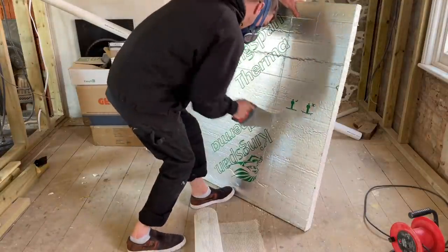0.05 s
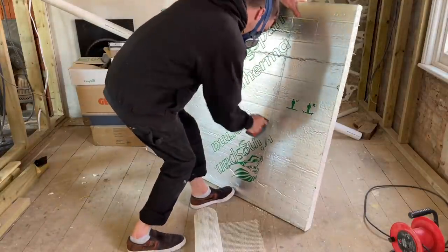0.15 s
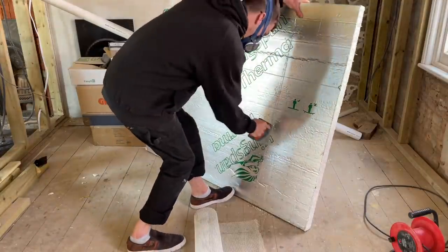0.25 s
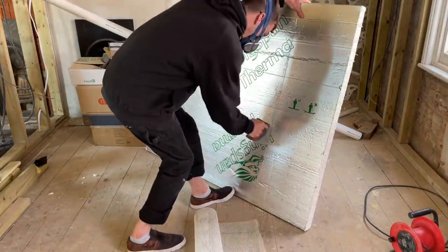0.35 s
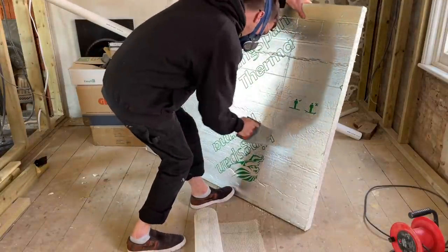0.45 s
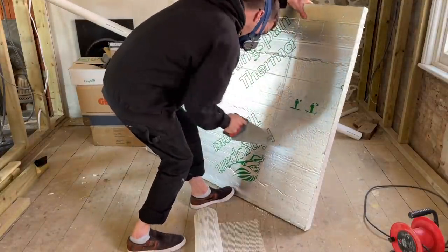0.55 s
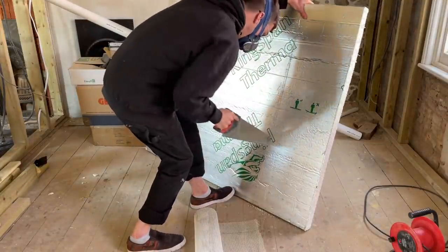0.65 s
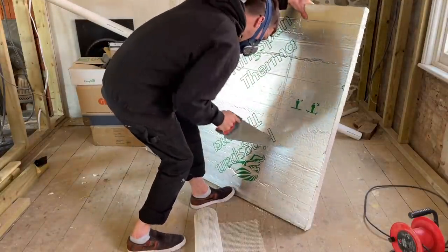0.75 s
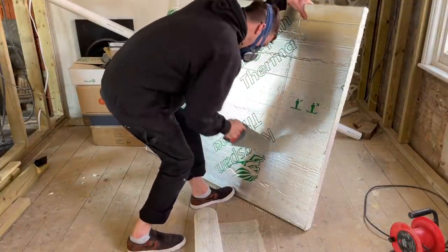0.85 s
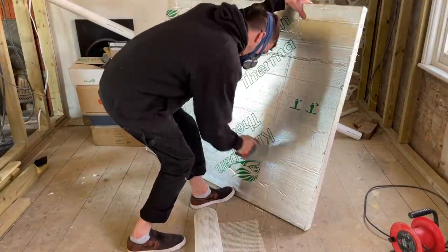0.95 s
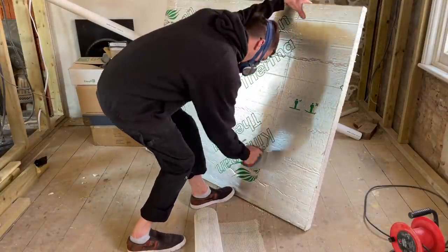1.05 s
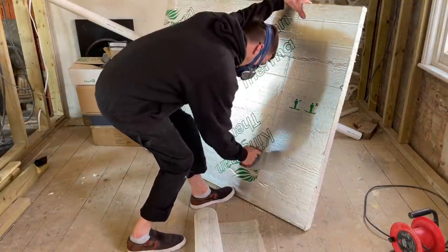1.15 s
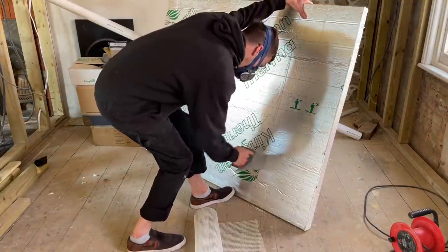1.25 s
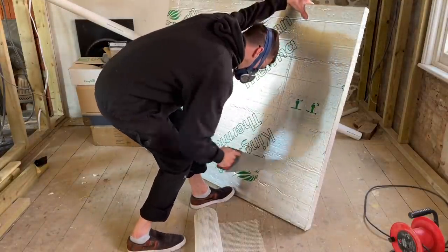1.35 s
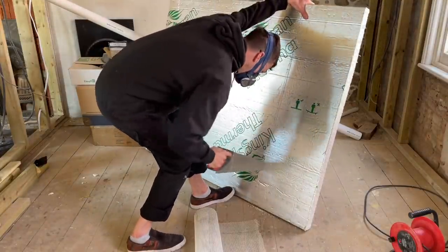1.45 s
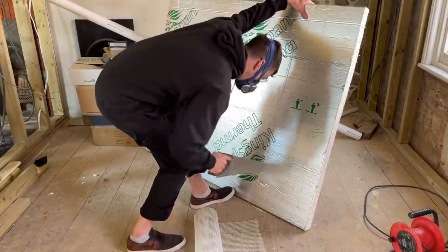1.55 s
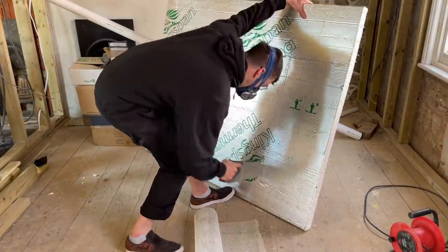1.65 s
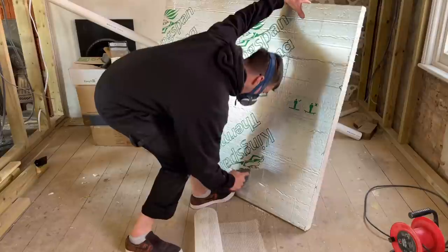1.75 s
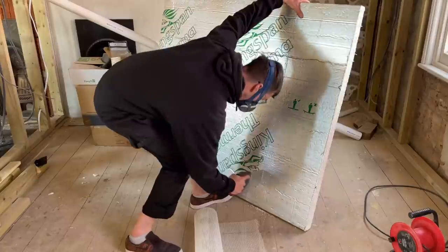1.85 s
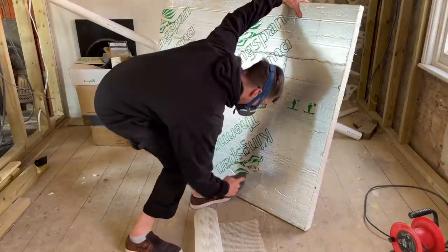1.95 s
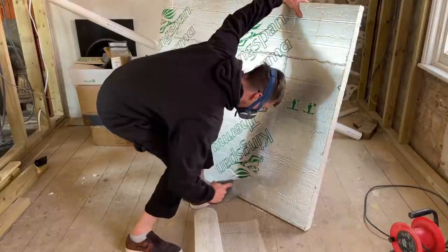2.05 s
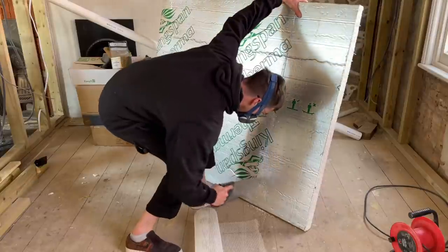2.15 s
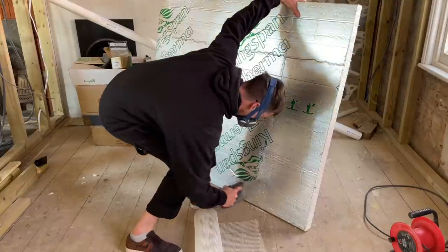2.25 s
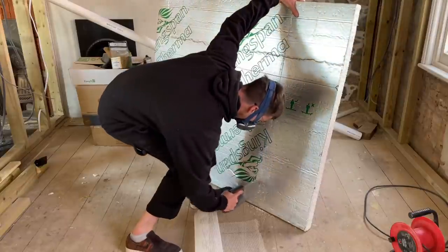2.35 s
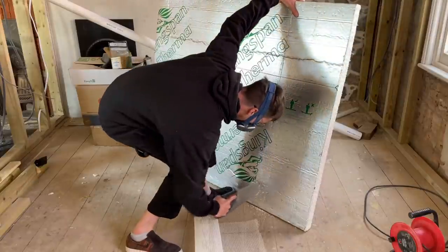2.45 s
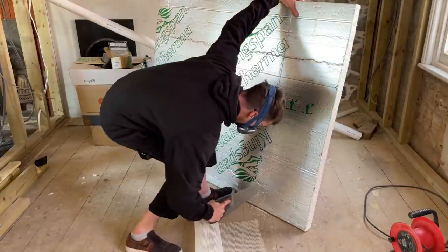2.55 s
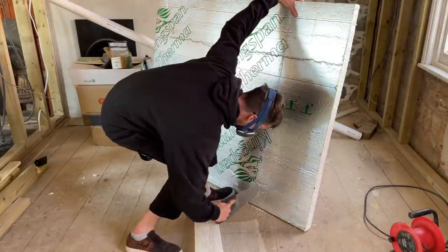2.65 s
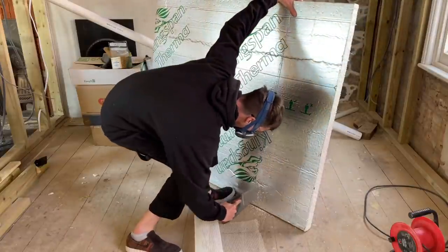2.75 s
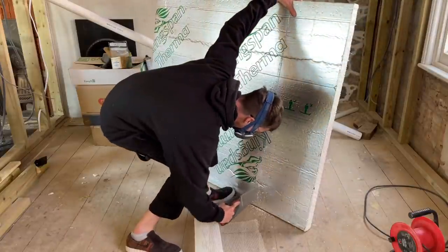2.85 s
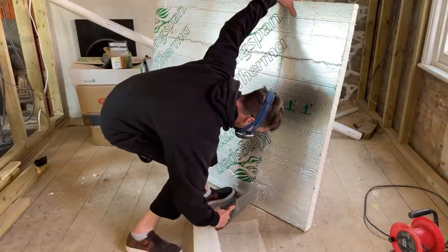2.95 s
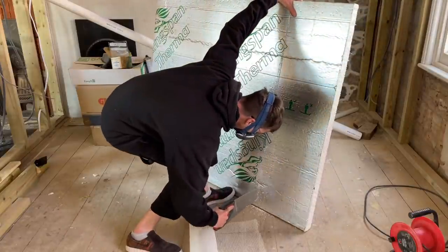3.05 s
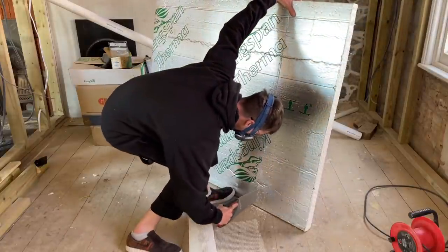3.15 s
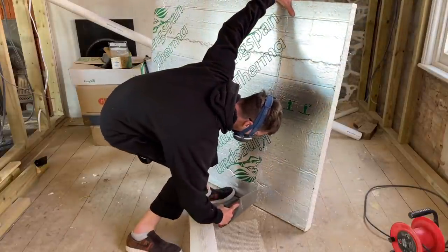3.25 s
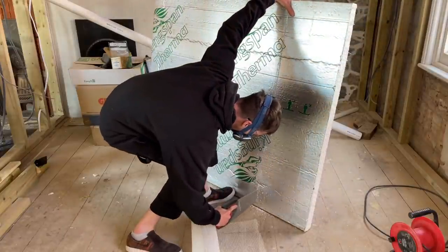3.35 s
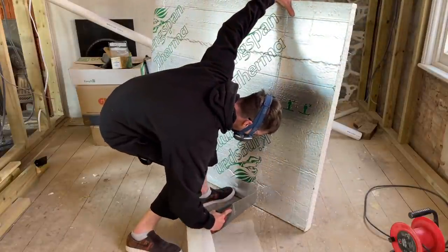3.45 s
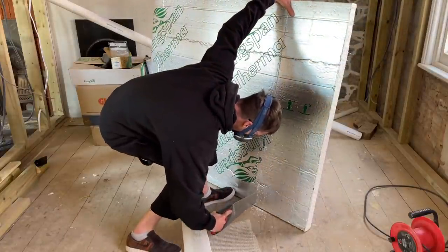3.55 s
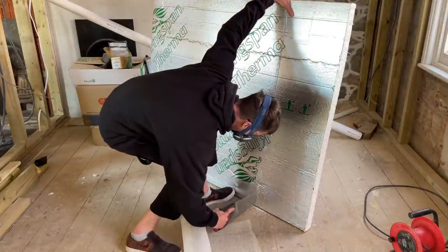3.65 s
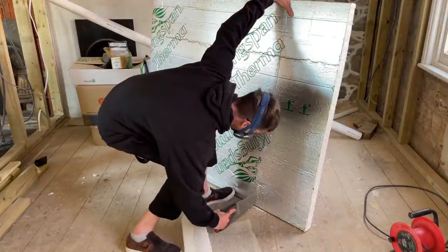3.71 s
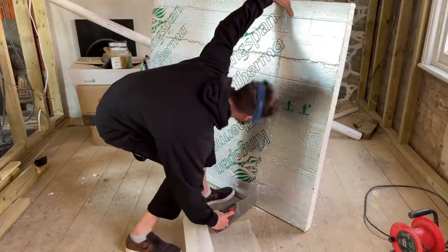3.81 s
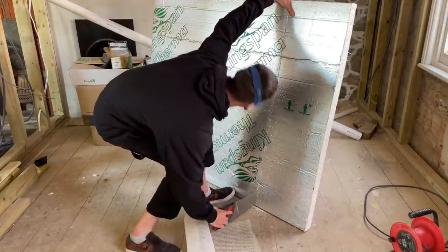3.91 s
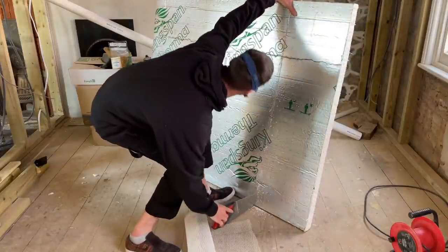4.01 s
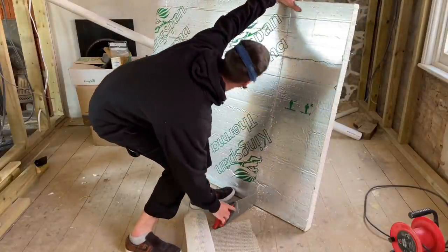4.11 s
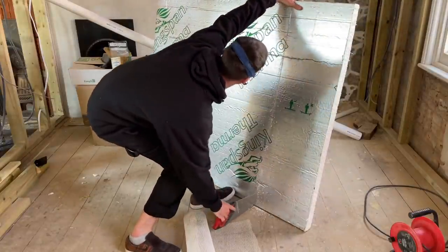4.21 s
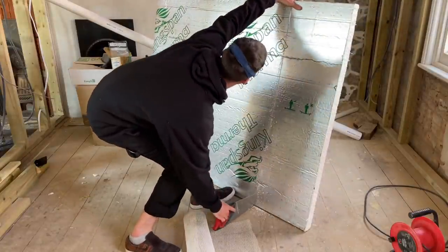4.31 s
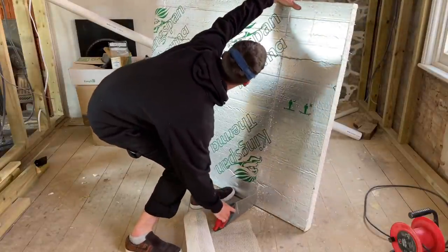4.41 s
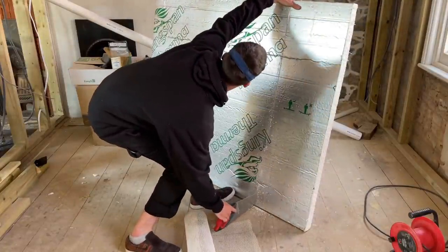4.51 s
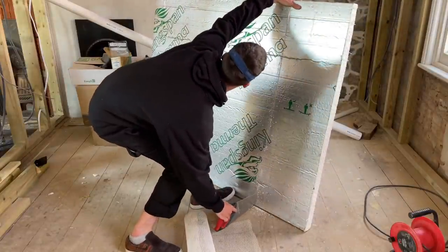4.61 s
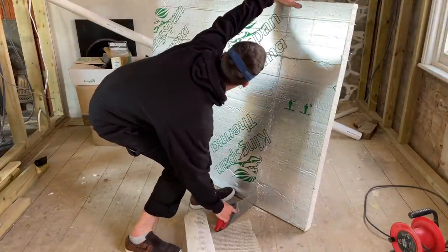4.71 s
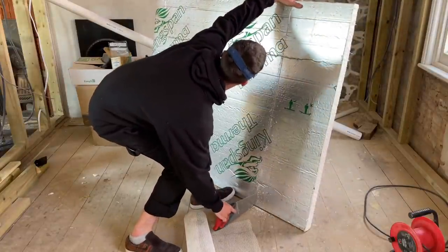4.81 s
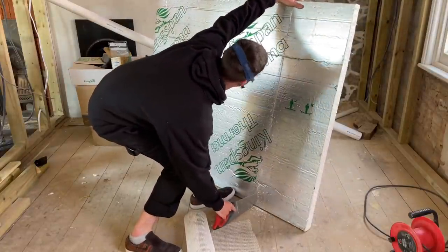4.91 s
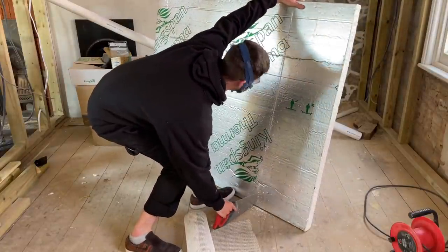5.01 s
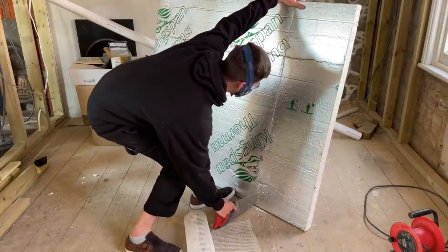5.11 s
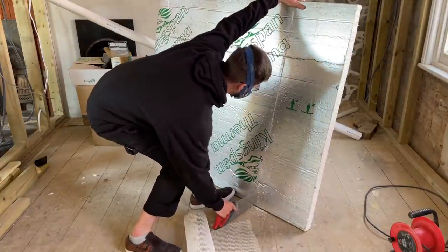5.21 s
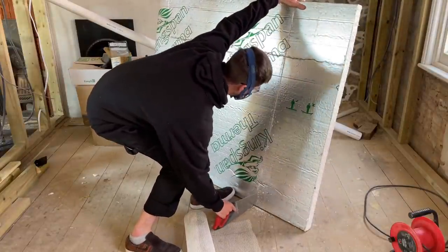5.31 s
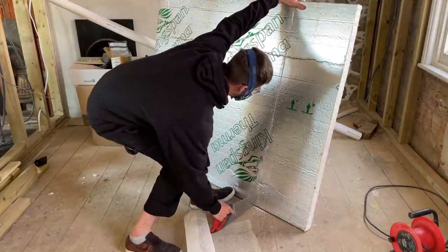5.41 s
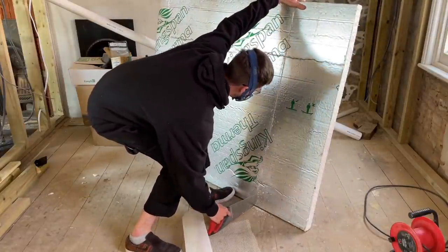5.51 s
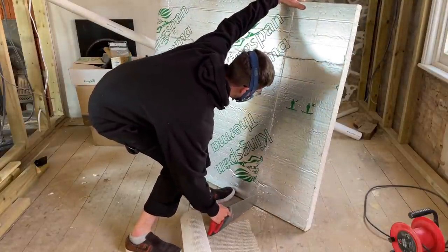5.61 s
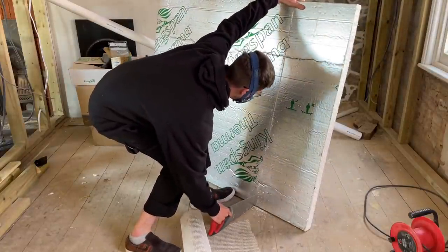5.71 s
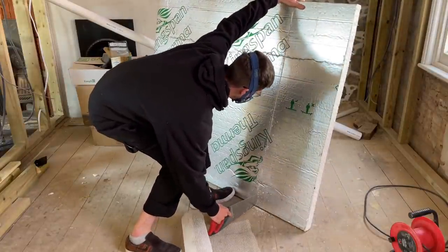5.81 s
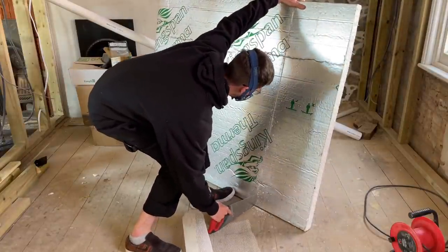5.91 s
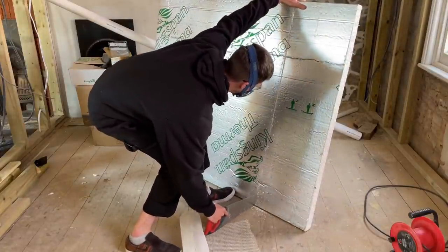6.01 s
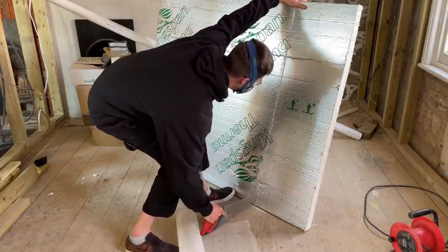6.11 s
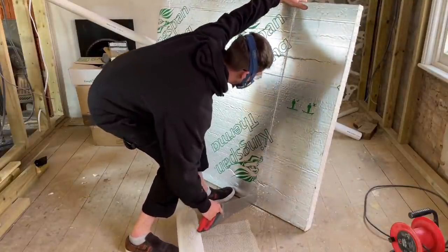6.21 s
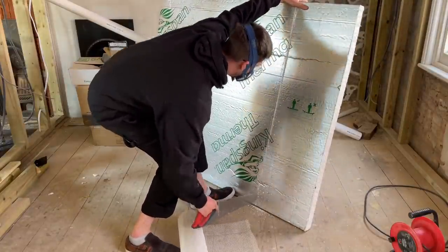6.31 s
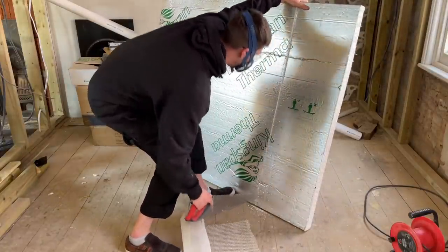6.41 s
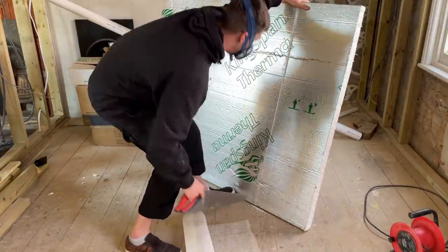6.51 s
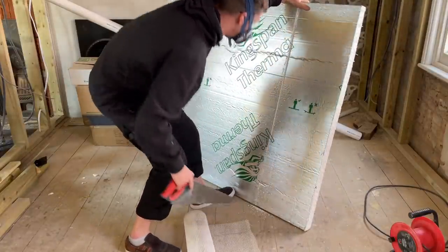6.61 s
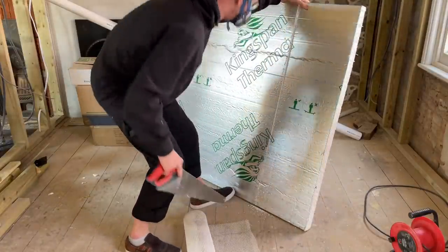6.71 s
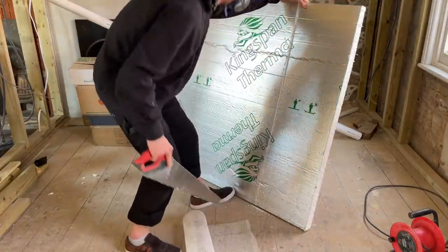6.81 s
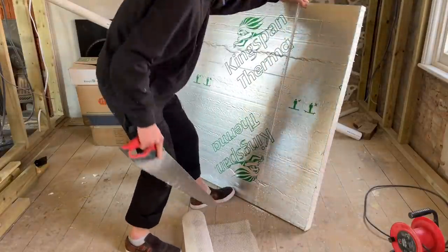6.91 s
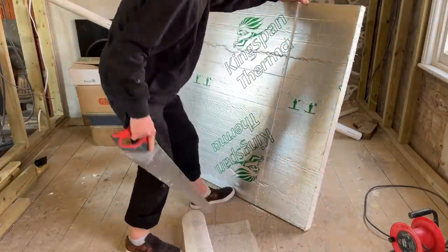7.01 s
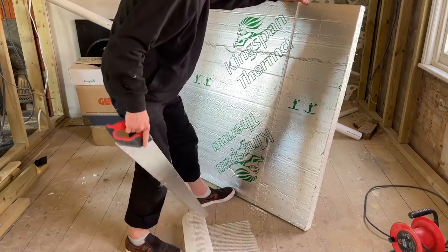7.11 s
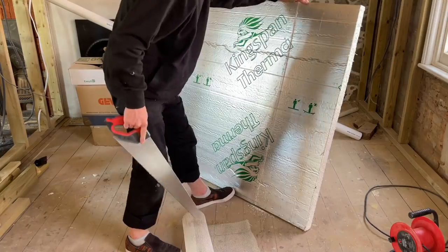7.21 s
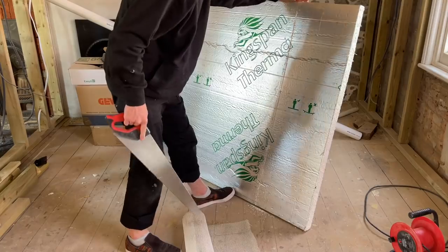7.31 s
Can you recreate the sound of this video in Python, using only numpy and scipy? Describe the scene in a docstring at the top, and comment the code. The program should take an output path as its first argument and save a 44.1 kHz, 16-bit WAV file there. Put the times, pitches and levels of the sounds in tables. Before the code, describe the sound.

A handsaw is already cutting through a foil-faced foam board at the start, heard from a few steps away in a bare room. The strokes crunch and rasp, the teeth buzz and make the board drum, and the blade gives thin, high squeaks and zings on the pulls. Soft low thuds come from the board rocking on the floor. From about 2 seconds the strokes get shorter and quicker, stopping at around 3.7 seconds. Two knocks on the board follow at about 4.2 and 4.4 seconds, the second with a brief, lower squeak. Light taps and soft scrapes come between 5 and 5.7 seconds. From about 5.9 to 6.5 seconds the blade is drawn out with a longer, squeaky rasp. A soft bump follows, then a faint scrape and a small tick near 7.2 seconds. Quiet room air and a faint hum lie underneath.

```python
"""A rasping crunch: a handsaw is pushing through foil-faced foam board, upright in a bare timber room.
Teeth drum the board and set it ringing, foam cells crumble, the blade squeaks in the cut and zings on
the pulls, and the board rocks on the floor. Then the saw is nudged, scraped along and drawn out.
A small two-port microphone listens a few steps away, over quiet room air and a faint hum."""
import sys
import numpy as np
from scipy import signal
from scipy.fft import rfft, irfft, next_fast_len
from scipy.io import wavfile
from scipy.ndimage import uniform_filter1d

SR = 44100
rng = np.random.default_rng(int(sys.argv[2]) if len(sys.argv) > 2 else 0)


def unload_audio(sound):
    """Save the sound as a 16-bit wav file, at the path given as the first command line argument."""
    columns = np.transpose(np.atleast_2d(sound))
    # keep every value between -1 and 1, then stretch to whole-number steps
    steps = np.round(np.clip(columns, -1, 1) * 32767)
    wavfile.write(sys.argv[1], SR, steps.astype(np.int16))


N = 324576

# Levels in the tables are relative; each layer sets its own mix gain.
# room tone spectrum: f/Hz, level/dB
AIR_EQ = [(15, -32.5), (25, -14), (64, -14.5), (97, -5), (140, -18), (210, -24), (500, -27), (1500, -34.5),
          (3400, -46), (10500, -39), (12000, -68)]
# hum partials: f/Hz, level/dB
HUM_TONES = [(91.5, -70), (500.6, -76)]
# reverb decay: f/Hz, t60/s
ROOM_DECAY = [(120, 0.51), (330, 0.24), (870, 0.51), (2300, 0.52), (6000, 0.38), (12000, 0.21)]
# the board rocks on the floor: t/s, level/dB
ROCK_THUDS = [(0.018, -46), (0.197, -39), (0.739, -39), (1.099, -38), (1.483, -36.5), (1.849, -42),
              (2.119, -37.5), (2.554, -41), (3.029, -55), (3.519, -34), (5.619, -41.5)]
# spectrum of those thuds: f/Hz, level/dB
ROCK_EQ = [(28, -43.5), (35, -9.5), (43, 6), (56, -0.5), (78, -15.5), (100, -1.5), (130, -22)]
# knocks on the board: t/s, level/dB, tick brightness/dB
KNOCKS = [(4.014, -54, -18), (4.198, -26.5, -20), (4.437, -29, -11), (4.982, -41.5, -31.5),
          (5.063, -37, -26), (5.15, -49, -16), (5.633, -48, -8), (6.571, -40.5, -30), (7.241, -44, 4)]
# board resonances: f/Hz, width/Hz, level/dB
BOARD_MODES = [(107, 13, -1), (139.6, 15, 4.5), (214.6, 13, 5), (243, 12, 0.5), (462.5, 15, 6.5),
               (619, 29, 0.5), (703, 26, 1), (797, 28, -7), (999, 18, -1.5), (1085, 23, -2),
               (1400, 45, -4.5)]
# steel squealing on foam: width/Hz, then a path of (t/s, f/Hz, level/dB)
SQUEALS = [ (700, [(.245, 2570, -33.5), (.27, 4890, -24.5), (.3, 6100, -15.5), (.315, 7300, -20.5)]),
           (202, [(.3, 6900, -23.5), (.345, 7460, -16.5), (.37, 6310, -16.5), (.4, 7300, -18),
           (.43, 6980, -30.5)]), (465, [(.31, 8750, -21), (.335, 8800, -22), (.365, 8360, -24.5)]),
           (139, [(.402, 8500, -26), (.445, 8520, -17), (.47, 9164, -22.5), (.505, 9340, -23),
           (.509, 9300, -12), (.516, 9470, -12.5), (.53, 9150, -28.5), (.62, 8830, -33.5)]),
           (1500, [(1.41, 6500, -33), (1.437, 5025, -23), (1.46, 4360, -44)]), (286, [(2.6, 5030, -42.5),
           (2.68, 4660, -24), (2.74, 4610, -51)]), (27.2, [(4.46, 662, -56), (4.485, 655, -38),
           (4.502, 649, -28.5), (4.525, 647, -41), (4.55, 647, -50)]), (59.5, [(4.47, 1330, -33),
           (4.53, 1306, -48), (4.56, 1330, -58)]), (600, [(5.16, 1112, -58), (5.22, 1396, -48),
           (5.27, 3530, -47.5)]), (700, [(5.32, 4300, -44.5), (5.41, 7540, -45), (5.45, 6800, -40),
           (5.48, 3550, -45)]), (124, [(1.14, 8900, -34.5), (1.17, 8100, -27.5), (1.21, 8700, -29.5),
           (1.25, 9300, -36)]), (120, [(1.24, 10800, -34.5), (1.28, 11000, -23.5), (1.34, 11300, -32)]),
           (147, [(2.8, 8300, -33), (2.85, 8500, -37), (2.95, 8300, -36), (2.97, 8200, -52.5)]),
           (118, [(5.59, 4500, -46), (5.63, 4400, -38), (5.68, 4200, -48)]), (100, [(5.96, 8600, -54),
           (6.02, 8650, -39), (6.07, 8500, -37)]), (200, [(6.088, 4100, -40), (6.096, 4200, -30.5),
           (6.12, 4700, -42)]), (120, [(6.35, 11700, -36.5), (6.365, 11900, -27.5), (6.38, 12000, -40)]),
           (520, [(5.59, 6000, -40.5), (5.63, 6300, -28.5), (5.67, 6100, -51)]), (350, [(5.9, 4200, -49),
           (5.96, 5900, -45.5), (6.03, 7000, -42.5), (6.08, 7200, -49)]), (247, [(5.88, 7400, -40),
           (5.98, 10370, -31), (6.12, 10200, -31.5), (6.2, 11230, -26.5), (6.28, 11800, -34.5)]),
           (150, [(6.072, 8150, -15), (6.085, 8100, -23), (6.12, 8770, -31.5), (6.2, 9500, -35),
           (6.3, 9300, -33), (6.38, 11000, -24.5), (6.42, 11120, -48.5)]), (204, [(6.12, 5580, -41),
           (6.22, 6750, -40), (6.3, 8100, -50.5)]), ]
# spectra of the four cutting textures: f/Hz, level/dB
CRUNCH_EQ = [(250, -36.5), (450, -3.5), (700, 0), (1400, -2), (2000, -8.5), (3100, -16), (5000, -31.5)]  # crumbling foam heard through the board
DRUM_EQ = [(70, -12.5), (120, -5.5), (220, -2.5), (330, -1), (450, -9.5), (700, -26.5)]  # low drumming of the board
RASP_EQ = [(1200, -5.5), (2000, -7), (3000, -9), (4400, 0), (5500, -1.5), (7000, -4), (8500, -0.5),
           (12000, -6)]  # blade rasp
FIZZ_EQ = [(5500, -35.5), (7500, -18.5), (8800, -3), (10400, 7.5), (12200, 5.5), (15500, -15.5)]  # bursting cells
# forward strokes: t/s, rise/s, fall/s, bite growth/dB, treble growth/dB (both per half stroke),
# then at full speed: crunch/dB, drum/dB, rasp/dB, fizz/dB, tooth rate/Hz, teeth/dB
PUSH_STROKES = [(-.14, 0.19, 0.17, -4, 2, -25.5, -33.5, -32, -31, 383.5, -34),
                (.66, 0.21, 0.22, 2, 6.5, -31, -31.5, -32, -36, 354.6, -28),
                (1.46, 0.17, 0.21, 4.5, 11, -25.5, -29.5, -29, -40, 340.2, -24.5),
                (2.07, 0.12, 0.19, -8, -4.5, -27.5, -30.5, -26, -25.5, 270.6, -26),
                (2.54, .11, 0.137, -4, -6.5, -25.5, -29.5, -27, -27.5, 234, -28),
                (3.0, 0.13, 0.099, 0.5, -4, -28.5, -29, -30.5, -26, 255.4, -37),
                (3.49, .14, 0.075, 7, -2.5, -22, -35.5, -26.5, -29, 223.4, -30)]
# back strokes: the same eleven columns, catch crunch/dB, catch rasp/dB,
# then the zing: top f/Hz, speed exponent, start/dB, full speed/dB, stop/dB
PULL_STROKES = [(.22, 0.27, 0.24, 4.5, -16.5, -41, -56, -47.5, -34, 347.7, -40, -36, -24.5, 9500, 0.45, -44.5, -44, -47),
                (1.085, 0.21, 0.16, 9.5, -6.5, -36.5, -38, -39.5, -25.5, 361.1, -35.5, -28, -23, 11280, 0.72, -30, -21.5, -88.5),
                (1.84, 0.15, 0.096, 3, 1, -37.5, -39.5, -40.5, -38, 324.2, -33.5, -73, -29.5, 9000, 0.39, -40, -63, -30),
                (2.379, 0.093, 0.079, 5, -7.5, -46.5, -32.5, -45.5, -32, 297, -44, -38, -56, 9100, 0.51, -62, -38, -26),
                (2.779, 0.12, 0.087, 23, 0, -52, -49, -57.5, -26.5, 271.7, -69, -58, -41.5, 8780, 0.43, -32, -47, -23),
                (3.245, 0.13, 0.089, 12.5, 3.5, -43.5, -35.5, -51, -26.5, 305.5, -40, -73, -33, 9310, .55, -31.5, -34, -28),
                (5.2, 0.19, 0.15, 0, 9, -58.5, -53, -50, -32.5, 199, -64, -68, -65, 10680, 0.88, -40.5, -29.5, -38.5),
                (5.85, 0.19, 0.49, 4, -3.5, -41.5, -41, -38.5, -29, 201, -54, -43.5, -38, 9450, 0.34, -42.5, -45.5, -35)]
# nudges and scrapes without teeth: the first nine columns of a forward stroke
SCRAPE_STROKES = [(4.172, 0.011, .03, -1.5, 0, -47, -59, -45, -62),
                  (4.19, 0.022, 0.087, -7, -3, -39, -51, -47, -53),
                  (4.436, 0.042, 0.19, -5, -4, -37.5, -44, -41, -48),
                  (4.7, 0.17, 0.64, 12, -7, -72, -71, -57.5, -60.5),
                  (5.13, 0.05, 0.85, -7, 2, -52, -65, -48, -69),
                  (5.55, 0.063, 0.11, -18.5, 9, -48.5, -58, -30.5, -37),
                  (5.62, 0.017, 0.14, 0, -12, -44, -41, -55, -57),
                  (6.06, 0.036, 0.05, 18, 7, -52, -52, -30.5, -51),
                  (6.3, 0.053, 0.089, 0, -15, -45.5, -39, -42.5, -29),
                  (7.08, 0.18, 0.067, 2.5, 1, -60.5, -62.5, -47, -53.5)]
# right microphone port against the left: f/Hz, likeness 0-1, gain/dB, phase lead/rad
MIC_PORTS = [(45, .995, -.3, 0), (85, .92, -1.5, 0), (140, .99, -.4, 0), (300, .975, -.4, .06),
             (860, .75, 0, .24), (1400, .64, -1, .45), (1900, .45, -1, .7), (2400, .62, -1, -.2),
             (2900, .3, -2, -.4), (4400, .76, -3, -.4), (5400, .5, -4, -.5), (6500, .84, -2, 0),
             (7400, .65, -3, -.7), (8550, .98, -.3, 0), (10200, .98, 0, 3.14), (12000, .98, 0, 6.28),
             (15300, .97, 0, 12.56)]
# treble loss of the microphone: f/Hz, level/dB
MIC_EQ = [(10800, 0), (12200, -11), (13600, -17)]

# speed exponents: how steeply crunch, drum, rasp, fizz and (except in scrapes) teeth swell with speed
PUSH_LAW, PULL_LAW = (1.78, 0.82, 0.69, 1.4, 2.3), (2.2, 1.3, 0.65, 0.93, 1.9)
SCRAPE_LAW = (0.74, 0.73, 2.1, 2)
DRAG_END_S, DRAG_DB = 3.75, (-50, -45, -41, -38)  # bed of crunch, drum, rasp, fizz under the sawing
CATCH_RISE_S, CATCH_T60_S = 0.037, 0.14  # the blade catches as each pull starts
SLOW_TEETH, TEETH_POWER = .5, 3.2  # share of the tooth rate left at the turns, speed exponent
ZING_FROM, SLOW_ZING, ZING_WIDTH_HZ = .36, .36, 850  # onset speed 0-1, share of top pitch there, width
STEEL_SPACING_HZ, STEEL_DB = 130, 3.5
AIR_DB, REVERB_DB, MODE_DRIFT_DB, RAGGED_DB, LOWPASS_HZ = -58, -5.5, 3, 3, 15900


def gain_of(db):
    """Decibels to gain."""
    return 10 ** (np.asarray(db) / 20)


def unit_rms(x):
    """Scales to rms 1."""
    return x / np.sqrt(np.mean(x ** 2) + 1e-20)


def curve_at(points, hz):
    """Reads the columns of a table on a log-frequency axis."""
    f, *values = np.transpose(points)
    return np.squeeze([np.interp(np.log(hz + 1), np.log(f + 1), v) for v in values])


def coloured(x, eq):
    """Shapes x with an EQ curve, rms 1."""
    size = next_fast_len(len(x))
    gain = gain_of(curve_at(eq, np.fft.rfftfreq(size, 1 / SR)))
    return unit_rms(irfft(rfft(x, size) * gain, size)[:len(x)])


def add(mix, s, sound):
    """Mixes a sound in at s seconds."""
    part = mix[round(s * SR):][:len(sound)]
    part += sound[:len(part)]


def wander(count, span_s):
    """Smooth random modulation, rms 1."""
    size = max(int(span_s * SR), 2)
    return unit_rms(uniform_filter1d(uniform_filter1d(rng.standard_normal(count), size), size))


def room_tone():
    """Quiet stereo air with a faint wavering hum."""
    t = np.arange(N) / SR
    air = np.array([coloured(rng.standard_normal(N), AIR_EQ) for _ in range(2)])
    hum = sum(gain_of(db + 1.2 * wander(N, span_s=.05)) * np.sqrt(2) * np.sin(2 * np.pi * hz * t)
              for hz, db in HUM_TONES)
    return gain_of(AIR_DB) * air + hum


def room_reverb(x):
    """Direct sound and a tail of sparse echoes, each band dying at its own speed."""
    echoes = np.zeros(SR)
    slots = np.arange(300, SR - 20, 20)
    echoes[slots + rng.integers(0, 20, len(slots))] = rng.choice([-1., 1.], len(slots))
    hz, t, bands = signal.stft(echoes, SR, nperseg=256)
    decay = gain_of(-60 * t / curve_at(ROOM_DECAY, hz)[:, None])
    response = signal.istft(bands * decay, SR, nperseg=256)[1]
    response *= gain_of(REVERB_DB) / np.linalg.norm(response)
    response[0] += 1  # direct sound
    return signal.fftconvolve(x, response / np.linalg.norm(response))[:N]


def board_rocking():
    """Soft low thuds: the whole board rocks against the floor when the saw turns."""
    envelope, t = np.zeros(N), np.arange(SR // 3) / SR
    attack = np.sin(np.pi / 2 * np.minimum(t / .035, 1)) ** 2
    for s, db in ROCK_THUDS:
        add(envelope, s, gain_of(db - 60 * t / .5) * attack)
    return gain_of(7.5) * envelope * coloured(rng.standard_normal(N), ROCK_EQ)


def board_ringing(force):
    """The board's modes ring on top of what drives it, swelling and fading as the contact moves."""
    steps = np.arange(0, len(force) + 2048, 2048)
    drift = uniform_filter1d(rng.standard_normal((len(steps), len(BOARD_MODES))), size=4, axis=0)
    out = force
    for (hz, width, db), swell in zip(BOARD_MODES, gain_of(MODE_DRIFT_DB * unit_rms(drift)).T):
        driven = force * np.interp(np.arange(len(force)), steps, gain_of(db) * swell)
        out = out + signal.lfilter(*signal.iirpeak(hz, hz / width, SR), driven)
    return out


def knocks():
    """Each contact gives a click and short crunch to drive the board, and a bright tick on top."""
    knock, tick, t = np.zeros(N), np.zeros(N), np.arange(2000) / SR
    click = 4 * (t == 0)
    for s, db, bright_db in KNOCKS:
        noise = rng.standard_normal((2, len(t)))
        add(knock, s, gain_of(db) * (click + noise[0] * gain_of(-60 * t / .04)))
        add(tick, s, noise[1] * gain_of(db + bright_db - 60 * t / 0.014))
    knock = signal.lfilter(*signal.butter(1, [500, 2400], "bandpass", fs=SR), knock)
    tick = signal.lfilter(*signal.butter(1, [3000, 7000], "bandpass", fs=SR), tick)
    return gain_of(2.5) * knock, gain_of(5) * tick


def hand_motion(start, rise_s, fall_s):
    """One stroke: first audible moment, progress -1..1 (0 at full speed) and blade speed 0-1."""
    onset = max(start, 0)
    t = np.arange(onset, start + rise_s + fall_s, 1 / SR) - start - rise_s
    progress = np.where(t < 0, t / rise_s, t / fall_s)
    return onset, progress, np.clip(np.cos(np.pi / 2 * progress), 0, 1)


def glide(path):
    """Start time and sample-by-sample pitch and level of a squeal."""
    times, *columns = np.transpose(path)
    t = np.arange(times[0], times[-1], 1 / SR)
    return times[0], *(np.interp(t, times, column) for column in columns)


def zing(start, rise_s, fall_s, top_hz, power, start_db, top_db, stop_db):
    """Start time, pitch and level of the whistle that rises and falls with the speed of a pull."""
    s, progress, speed = hand_motion(start, rise_s, fall_s)
    drive = np.clip((speed - ZING_FROM) / (1 - ZING_FROM), 0, 1)
    hz = top_hz * (SLOW_ZING + (1 - SLOW_ZING) * drive ** power)
    turn_db = np.where(progress < 0, start_db, stop_db)
    fade_db = 20 * np.log10(np.minimum(3 * drive, 1) + 1e-4)
    return s, hz, turn_db + (top_db - turn_db) * drive ** 2 + fade_db


def blade_modes(x):
    """The dense narrow modes of the steel pick thin lines out of a squeal above 3 kHz."""
    size = next_fast_len(len(x))
    hz = np.fft.rfftfreq(size, 1 / SR)
    grid_hz = np.arange(0, SR / 2 + 1, STEEL_SPACING_HZ)
    ripple = gain_of(STEEL_DB * rng.standard_normal(len(grid_hz)) * (grid_hz > 3000))
    return irfft(rfft(x, size) * np.interp(hz, grid_hz, unit_rms(ripple)), size)[:len(x)]


def squeaks():
    """Stick-slip whistles: narrow ones are fluttering tones, wide ones ragged bands of noise."""
    out = np.zeros(N)
    squeals = [(width, *glide(path)) for width, path in SQUEALS]
    zings = [(ZING_WIDTH_HZ, *zing(*stroke[:3], *stroke[13:])) for stroke in PULL_STROKES]
    for width, s, hz, db in squeals + zings:
        count = len(hz)
        jitter_hz = min(width, 200) * wander(count, span_s=.004)
        noisiness = min(width / 400, 1)
        slips = np.sqrt(1 - noisiness ** 2) + noisiness * wander(count, span_s=0.25 / width)
        flutter_db = 0.79 * wander(count, span_s=0.0038)
        ragged_db = RAGGED_DB * noisiness * wander(count, span_s=0.035)
        envelope = gain_of(db + flutter_db + ragged_db) * signal.windows.tukey(count, .01)
        tone = np.sqrt(2) * np.cos(2 * np.pi * np.cumsum(hz + jitter_hz) / SR)
        add(out, s, tone * slips * envelope)
    return blade_modes(out)


def crumbs(per_s, spread_db, flicker_db):
    """Foam cells burst at random moments, a few large, in clumps."""
    size = gain_of(spread_db * np.minimum(rng.exponential(1, N), 5))
    bursts = rng.random(N) < per_s / SR
    return size * bursts * rng.standard_normal(N) * gain_of(flicker_db * wander(N, span_s=.01))


def patchy_hiss(x, patch_db):
    """Short narrow patches of the hiss flare and fade at random."""
    bands = signal.stft(x, nperseg=256)[2]
    patches = uniform_filter1d(rng.standard_normal(bands.shape), size=2, axis=0)
    patches = unit_rms(uniform_filter1d(patches, size=6, axis=1))
    return unit_rms(signal.istft(bands * gain_of(patch_db * patches), nperseg=256)[1][:len(x)])


def cut_envelopes():
    """Gains of crunch, drum, rasp and fizz: steady drag, a swell per stroke and a catch per pull."""
    in_cut = np.clip((DRAG_END_S - np.arange(N) / SR) / 0.089, 0, 1)
    envelopes = np.outer(in_cut, gain_of(DRAG_DB))
    for strokes, law in (PUSH_STROKES, PUSH_LAW), (PULL_STROKES, PULL_LAW), (SCRAPE_STROKES, SCRAPE_LAW):
        for stroke in strokes:
            s, progress, speed = hand_motion(*stroke[:3])
            growth_db, full_speed_db = np.repeat(stroke[3:5], 2), stroke[5:9]
            db = np.outer(progress, growth_db) + full_speed_db
            add(envelopes, s, gain_of(db) * np.power.outer(speed, law[:4]))
    t = np.arange(SR // 3) / SR
    attack = np.sin(np.pi / 2 * np.minimum(t / CATCH_RISE_S, 1)) ** 2
    catch = attack * gain_of(-60 * np.maximum(t - CATCH_RISE_S, 0) / CATCH_T60_S)
    for stroke in PULL_STROKES:
        crunch, rasp = gain_of(stroke[11:13])
        add(envelopes, stroke[0], np.outer(catch, [crunch, 0, rasp, 0]))
    return envelopes.T


def cutting():
    """The blade crumbles foam: bite (crunch, drum) to drive the board, and hiss (rasp, fizz)."""
    envelopes = cut_envelopes()
    crunch = gain_of(-2.5) * coloured(crumbs(per_s=5000, spread_db=1.5, flicker_db=2), CRUNCH_EQ)
    drum = gain_of(-4.5) * coloured(rng.standard_normal(N), DRUM_EQ)
    rasp = patchy_hiss(coloured(crumbs(per_s=6000, spread_db=1.5, flicker_db=1.5), RASP_EQ), patch_db=2.5)
    fizz = patchy_hiss(coloured(crumbs(per_s=8000, spread_db=1.5, flicker_db=1.5), FIZZ_EQ), patch_db=3)
    crunch, drum, rasp, fizz = envelopes * [crunch, drum, rasp, fizz]
    return crunch + drum, rasp + fizz


def saw_teeth():
    """Each tooth pushes the board once: an uneven, buzzing pulse train that grips and lets go."""
    out = np.zeros(N)
    for strokes, law in (PUSH_STROKES, PUSH_LAW), (PULL_STROKES, PULL_LAW):
        for stroke in strokes:
            s, progress, speed = hand_motion(*stroke[:3])
            growth_db, top_hz, db = stroke[3], stroke[9], stroke[10]
            hz = top_hz * (SLOW_TEETH + (1 - SLOW_TEETH) * speed ** TEETH_POWER)
            uneven = .015 * wander(len(hz), span_s=.008)
            cycles = np.cumsum(hz * (1 + uneven)) / SR + rng.random()
            pulses = sum(gain_of(-7 * k) * np.cos(2 * np.pi * (k + 1) * cycles) for k in range(5))
            grip_db = 2.5 * wander(len(hz), span_s=.012)
            add(out, s, pulses * gain_of(db + growth_db * progress + grip_db) * speed ** law[4])
    return out


def scene():
    """Saw and board in the room: once for the left port, once more for what only the right port hears."""
    channels, rocking, buzz = [], board_rocking(), saw_teeth()
    for _ in range(2):
        bite, hiss = cutting()
        knock, tick = knocks()
        board = board_ringing(bite + buzz + knock)
        channels.append(room_reverb(board + hiss + tick + squeaks() + rocking))
    return np.array(channels) + room_tone()


def record(dry):
    """The right port shares part of the left sound, turned in phase; then treble loss and a low-pass."""
    size = next_fast_len(N + 4096)
    left, right_only = rfft(dry, size)
    hz = np.fft.rfftfreq(size, 1 / SR)
    likeness, right_db, lead = curve_at(MIC_PORTS, hz)
    blend = likeness * left + np.sqrt(1 - likeness ** 2) * right_only
    right = blend * gain_of(right_db) * np.exp(1j * lead)
    pair = irfft(np.array([left, right]) * gain_of(curve_at(MIC_EQ, hz)), size)[:, :N]
    lowpass = signal.firwin(511, LOWPASS_HZ, window=("kaiser", 9), fs=SR)
    return signal.oaconvolve(pair, lowpass[None], "same")


dry = scene()
out = record(dry)
unload_audio(out)
```